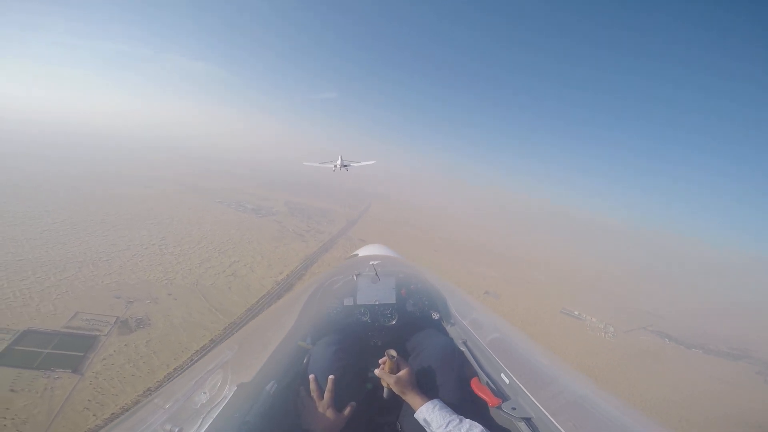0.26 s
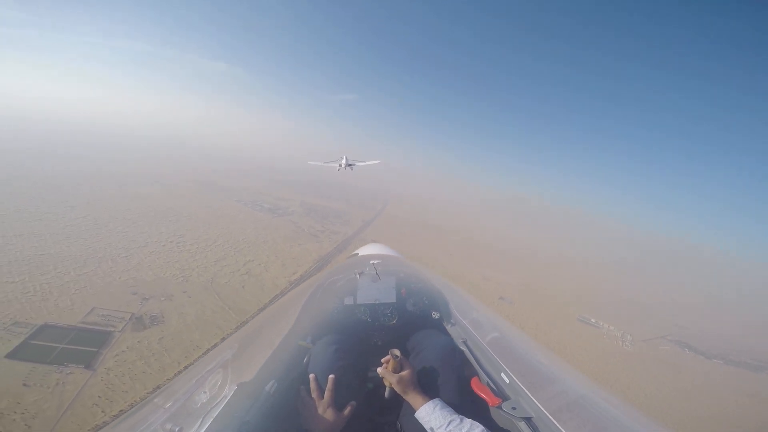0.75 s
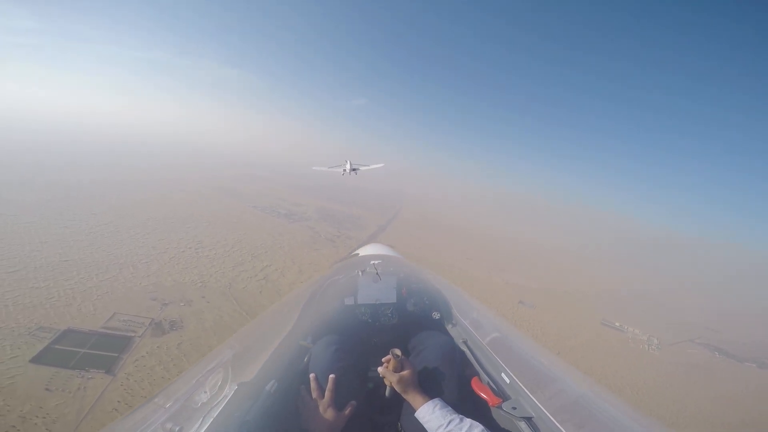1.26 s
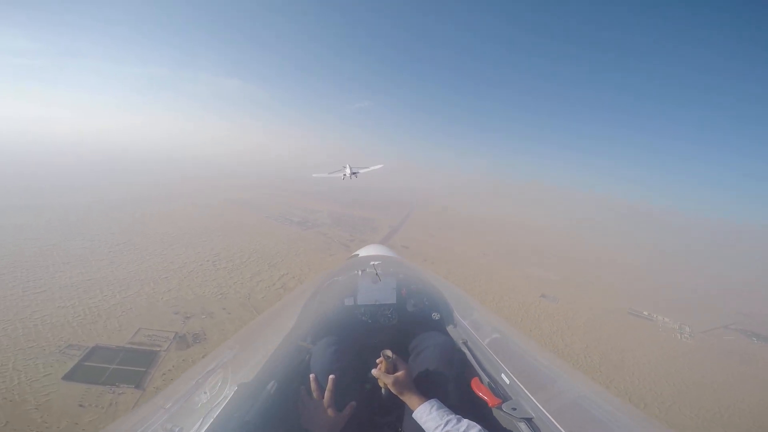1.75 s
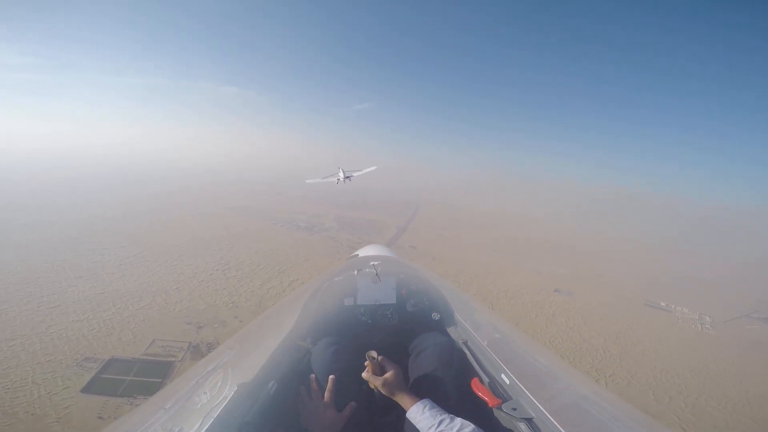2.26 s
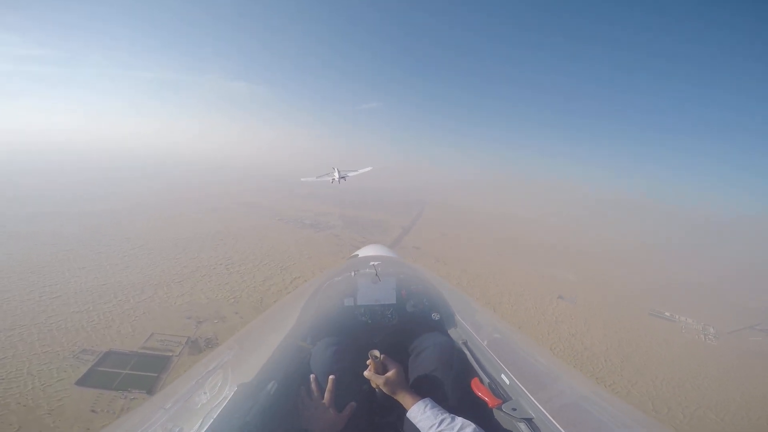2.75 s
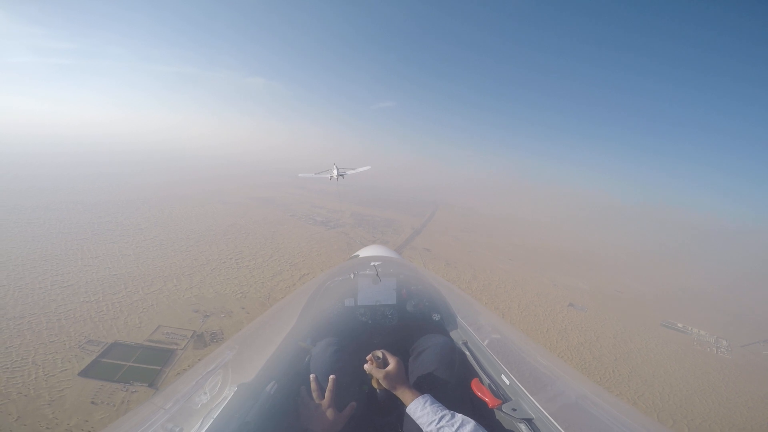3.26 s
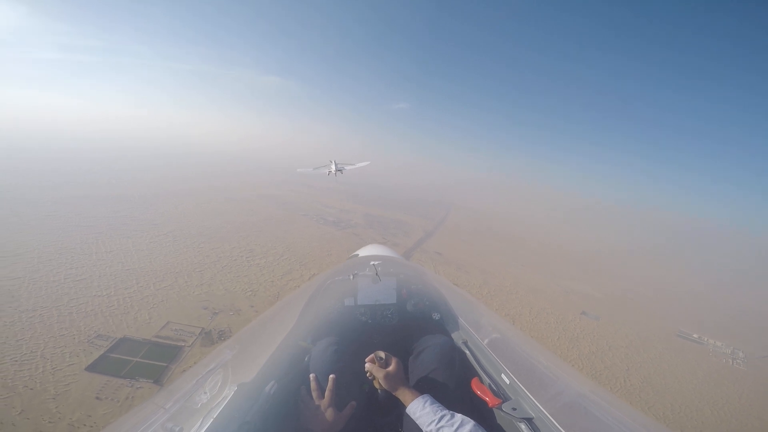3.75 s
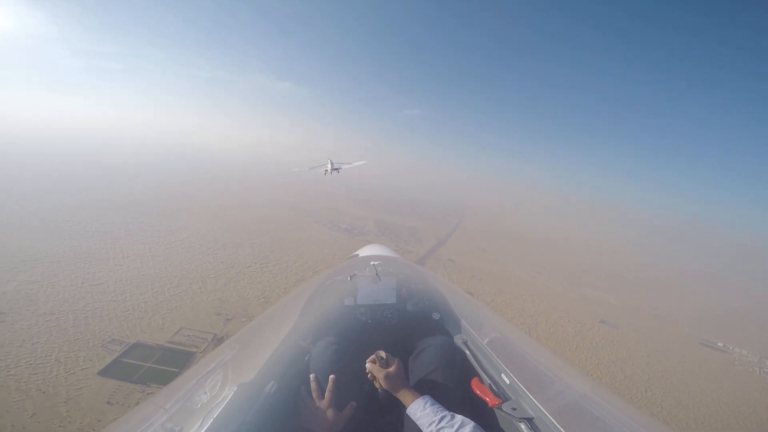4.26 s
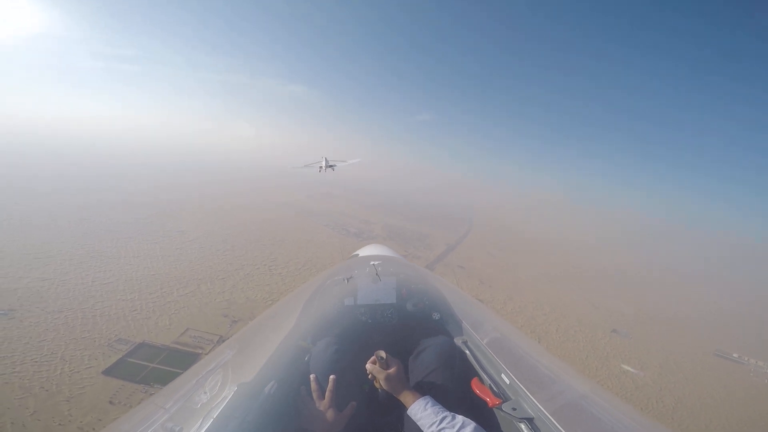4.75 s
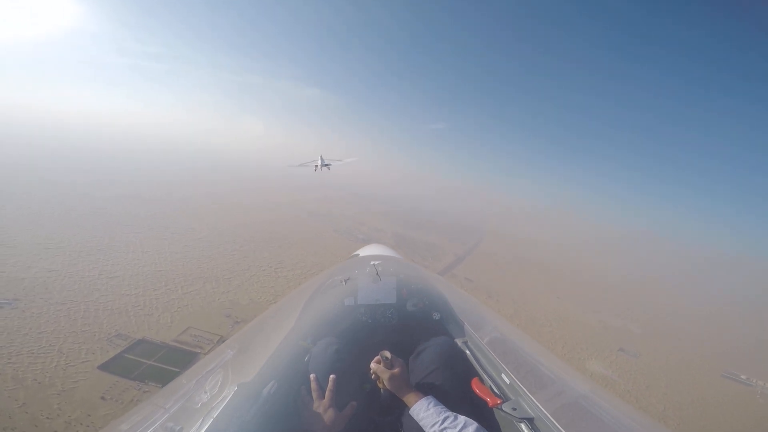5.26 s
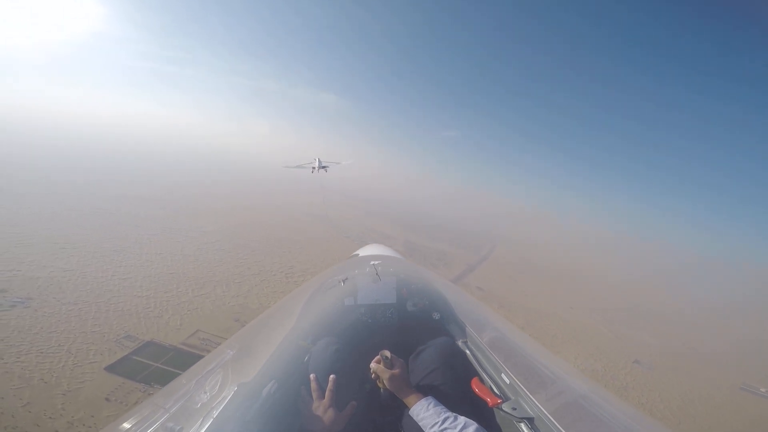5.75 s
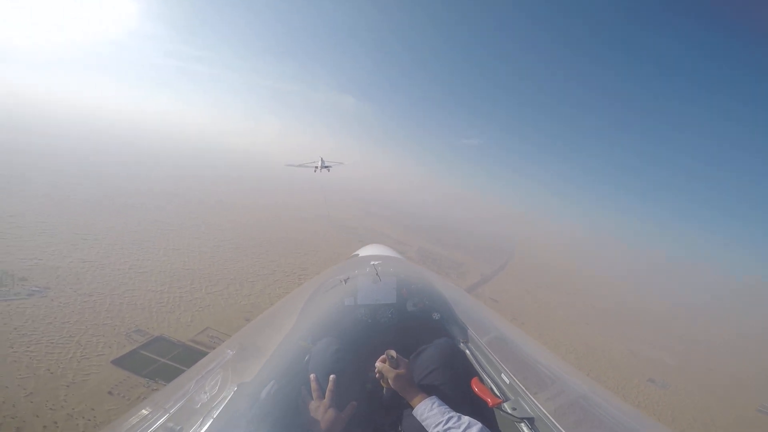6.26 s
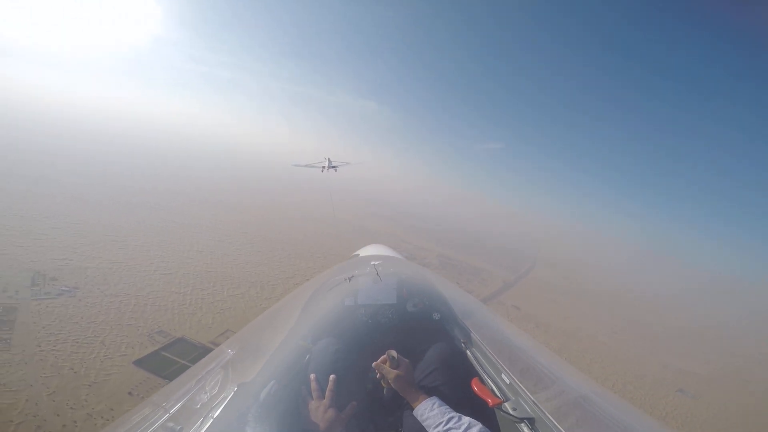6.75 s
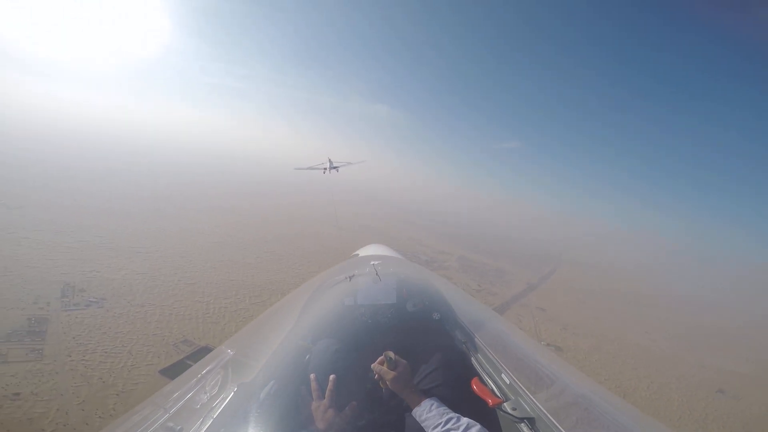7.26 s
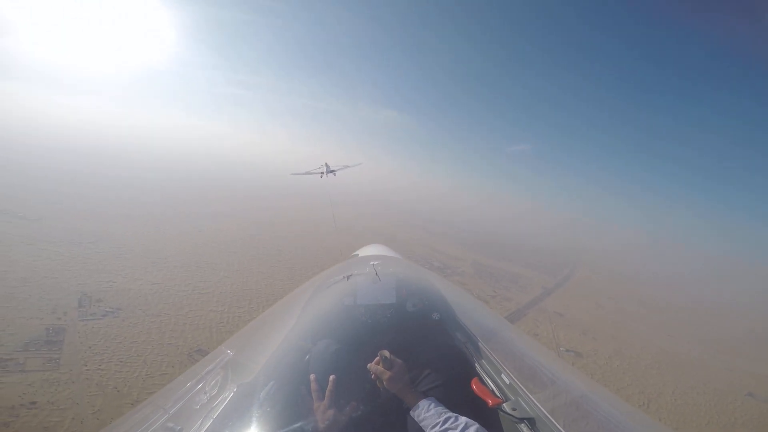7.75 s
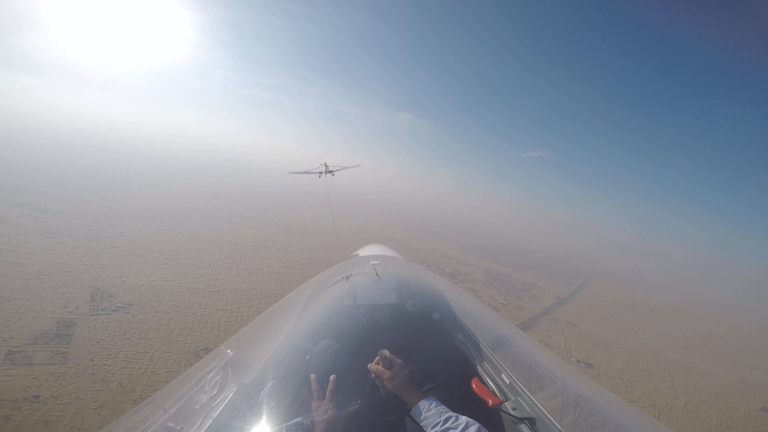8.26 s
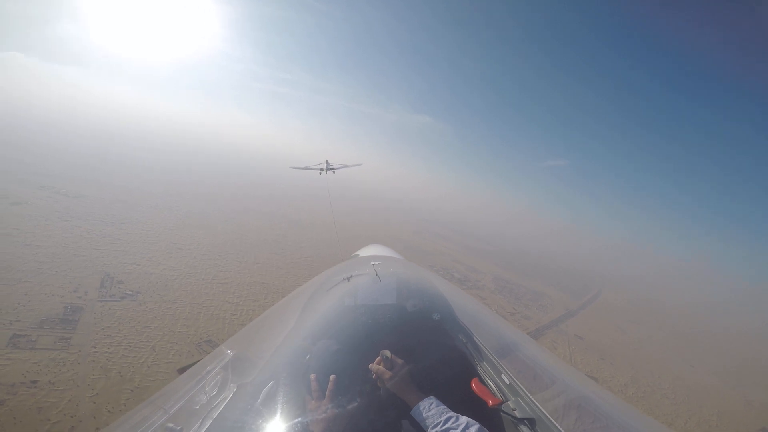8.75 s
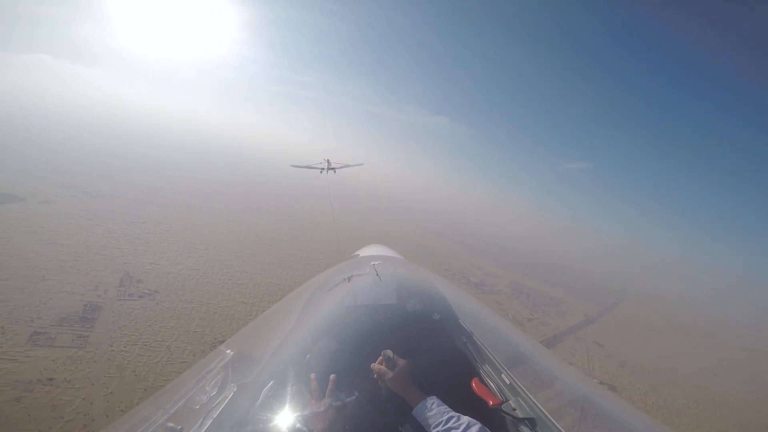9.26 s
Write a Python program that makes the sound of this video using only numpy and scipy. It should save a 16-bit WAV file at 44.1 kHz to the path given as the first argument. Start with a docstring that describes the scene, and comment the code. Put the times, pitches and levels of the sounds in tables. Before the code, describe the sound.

Heard close from a small microphone inside a glider cockpit, the slipstream makes a continuous rush and hiss from start to finish. A low rumble runs underneath, along with a deep, wavering boom as the air pumps the cockpit. The boom swells early, falls back, then returns in irregular surges, while the rush stays level and only changes a little in brightness.

```python
"""Open glider cockpit on tow

The slipstream tears over the cockpit rim: a steady rush and hiss, made of noise coloured by the hollows it passes.
Vortices shed across the opening make the cockpit's air boom in uneven surges: a low tone with an unsteady pitch.
Slow eddies around the fuselage add a low rumble of deep noise. One small camera microphone hears it all."""
import sys
import numpy as np
from scipy import signal
from scipy.fft import rfft, irfft, next_fast_len
from scipy.io import wavfile

SR = 44100
rng = np.random.default_rng(int(sys.argv[2]) if len(sys.argv) > 2 else 0)


def persist_wave(psi):
    """Save psi, clipped to +-1, as 16-bit WAV."""
    counts = np.round(np.clip(psi, -1, 1) * 32767).astype(np.int16)
    wavfile.write(sys.argv[1], SR, np.atleast_2d(counts).T)


N = 419391
TIME = np.arange(N) / SR  # seconds

# Turbulence at the rim, only the shape of its spectrum: pitch_hz, relative_level_db
RIM_SPECTRUM = [(60, -22), (110, -16), (335, -14.5), (372, -19.5), (532, -18), (608, -9), (992, -9),
                (1443, -15), (2755, -10.5), (4103, -9), (4284, -16), (4997, -22), (8846, -31.0),
                (15263, -42)]
# Hollows of the cockpit and camera housing, and dips where reflections cancel: centre_hz, width_hz, change_db
HOLLOW_BANDS = [(223.7, 25.5, 8), (329, 33, 1.4), (1887, 504, 10), (2170, 117, 4), (2550, 180, 2),
                (2996, 240, 3.5), (3467, 420, 7.5), (3890, 516, 7.5), (4290, 71, -4), (4440, 219, 3),
                (4755, 165, 7), (5670, 350, 4.5), (6030, 225, -2.5), (6580, 192, -1.5), (6930, 350, 2.5),
                (7780, 840, 8), (8642, 211, 2.5), (10377, 1107, 11), (11200, 416, -3.8), (12754, 1128, 5.2)]
# Brightness of the roar, shifting as the flow meets the rim at a changing angle: time_s, brightness_db
BRIGHTNESS_CURVE = [(0.0, -1), (0.2, 0.3), (0.65, -1.0), (1.4, -0.5), (1.85, 1.7), (4.1, 2.0), (5.15, -0.5),
                    (6.15, 1.1), (6.8, -0.8), (7.9, 0.0), (8.1, -1), (9.5, -0.9)]
# Bands that rise or sink as the roar brightens: centre_hz, width_hz, change_db_per_brightness_db
BRIGHTENING_BANDS = [(470, 170, -1.1), (1230, 410, -1.35), (1790, 500, 1.1)]
# While the flow has let go of a hollow, its roar sinks and a deeper resonance takes over:
# centre_hz, width_hz, change_db
LETTING_GO_BANDS = [(322, 80, 4.5), (672, 200, -7.2), (930, 130, 1.5)]
# How hard the vortices pump the cockpit's air: time_s, relative_level_db
BUFFET_CURVE = [(0.0, -19.5), (1.35, -15.5), (1.95, -31), (2.25, -24), (2.8, -26), (3.55, -19),
                (3.6, -24.5), (4.7, -21.5), (4.8, -18.5), (5.15, -20), (5.35, -33.1), (5.65, -25),
                (6.3, -22), (6.75, -24.0), (7.9, -20.5), (8.0, -14), (8.35, -26.5), (9.5, -20.5)]
# Slow eddies around the fuselage, only the shape of their spectrum: pitch_hz, relative_level_db
EDDY_SPECTRUM = [(8, -30), (14, -5), (21, -4.5), (33, 2.5), (47, 6), (62, 3.5), (80, -0.5), (100, -8),
                 (150, -9.5), (230, -23), (400, -50)]

# The flow lets go of the hollow it was blowing across, then catches it again; each change takes CHANGE_S
LET_GO_S, CATCH_S, CHANGE_S = 2.06, 3.62, 0.4
SHEDDING_HZ = 52.8  # vortices per second at the steady speed of the tow
FRAME = 2048  # samples in each short slice of the changing spectrum
HISS_FROM_HZ = 4500
MICROPHONE_LIMIT_HZ = 15300


def slipstream(level_db=-16.0, flutter_db=0.47, flutter_hz=45, gust_db=0.1, gust_hz=1.3,
               eddy_db=0.5, eddy_hz=8):
    """The rush over the rim: its broad resonances swell and sink, and eddies flutter the hiss."""
    noise = turbulence(RIM_SPECTRUM, HOLLOW_BANDS)
    hz, t, slices = signal.stft(noise, SR, nperseg=FRAME)
    hz = hz[:, None]

    eddies_db = eddy_db * np.interp(t, TIME, wander(eddy_hz))
    bright_db = follow(BRIGHTNESS_CURVE, t) + eddies_db
    # 0 while the flow holds on to the hollow, 1 once it has let go
    inside_s = np.minimum(t - LET_GO_S, CATCH_S - t)
    let_go = np.clip(0.5 + inside_s / CHANGE_S, 0, 1)

    swell_db = bright_db * coloured(BRIGHTENING_BANDS, hz)
    swell_db = swell_db + let_go * coloured(LETTING_GO_BANDS, hz)
    rush = signal.istft(slices * gain_of(swell_db), SR, nperseg=FRAME)[1][:N]

    # the finest hiss also responds to slow gusts and passing eddies
    high_pass = signal.butter(2, HISS_FROM_HZ, "high", fs=SR, output="sos")
    hiss = signal.sosfiltfilt(high_pass, rush)
    hiss_db = gust_db * wander(gust_hz) + flutter_db * wander(flutter_hz)
    hiss_change = hiss * (gain_of(hiss_db) - 1)
    return gain_of(level_db) * (rush + hiss_change)


def boom(level_db=-3.4, jitter_hz=2.13, jitter_rate_hz=14.8, unsteady=0.51, throb_hz=9):
    """The cockpit's air swings like the air in a bottle; uneven vortices push it in and out of step."""
    buffet_db = follow(BUFFET_CURVE, TIME)
    pitch_hz = SHEDDING_HZ + jitter_hz * wander(jitter_rate_hz)
    turns = np.cumsum(pitch_hz) / SR
    # the complex wander changes both the strength and the timing of the swing
    swing = 1 + unsteady * (wander(throb_hz) + 1j * wander(throb_hz))
    tone = (swing * np.exp(2j * np.pi * turns)).real
    return gain_of(level_db + buffet_db) * evened(tone)


def rumble(level_db=-31.0, coupling=0.26):
    """Irregular eddies make deep noise that grows with the buffeting, by coupling dB per dB."""
    buffet_db = follow(BUFFET_CURVE, TIME)
    surge_db = coupling * (buffet_db - np.median(buffet_db))
    return gain_of(level_db + surge_db) * turbulence(EDDY_SPECTRUM)


def turbulence(spectrum, resonances=()):
    """Tangled air: noise of rms 1 with a broad spectrum and resonances on top."""
    size = next_fast_len(N)
    hz = np.fft.rfftfreq(size, 1 / SR)
    colour_db = read(spectrum, hz) + coloured(resonances, hz)
    white = rfft(rng.standard_normal(size))
    return evened(irfft(white * gain_of(colour_db), size)[:N])


def wander(rate_hz):
    """Slow random drift of rms 1, with its changes fading out above the given rate."""
    size = next_fast_len(N)
    hz = np.fft.rfftfreq(size, 1 / SR)
    white = rfft(rng.standard_normal(size))
    return evened(irfft(white / (1 + (hz / rate_hz) ** 2), size)[:N])


def coloured(bands, hz):
    """A row of resonant humps and dips, added up in dB."""
    return sum(db * bell(hz, centre_hz, width_hz) for centre_hz, width_hz, db in bands)


def bell(hz, centre_hz, width_hz):
    """A hump of height 1, width_hz wide at half height."""
    return 0.5 ** ((2 * (hz - centre_hz) / width_hz) ** 2)


def read(points, hz):
    """A spectrum joined by straight lines on a log-frequency axis."""
    point_hz, value = np.transpose(points)
    return np.interp(np.log(hz + 1), np.log(point_hz + 1), value)  # + 1 avoids log(0)


def follow(curve, t):
    """The value of a curve at the times t, in straight lines between its points."""
    time_s, value = np.transpose(curve)
    return np.interp(t, time_s, value)


def gain_of(db):
    """Decibels to amplitude."""
    return 10 ** (np.asarray(db) / 20)


def evened(x):
    """Scales a sound to rms 1."""
    return x / np.sqrt(np.mean(x ** 2) + 1e-20)


def scene():
    """All the air meets at one microphone, which feeds both channels."""
    air = slipstream() + boom() + rumble()
    return np.array([air, air])


def record(dry):
    """The camera's steep band limit removes the highest treble."""
    taps = signal.firwin(1023, MICROPHONE_LIMIT_HZ, window=("kaiser", 9), fs=SR)
    return signal.oaconvolve(dry, taps[None], "same")


dry = scene()
out = record(dry)
persist_wave(out)
```